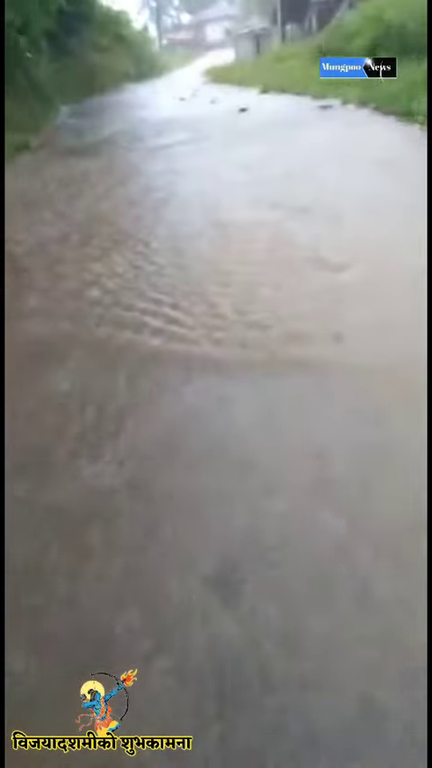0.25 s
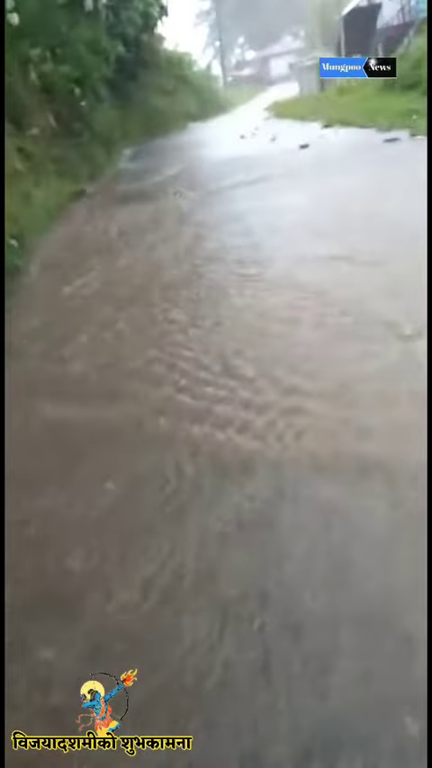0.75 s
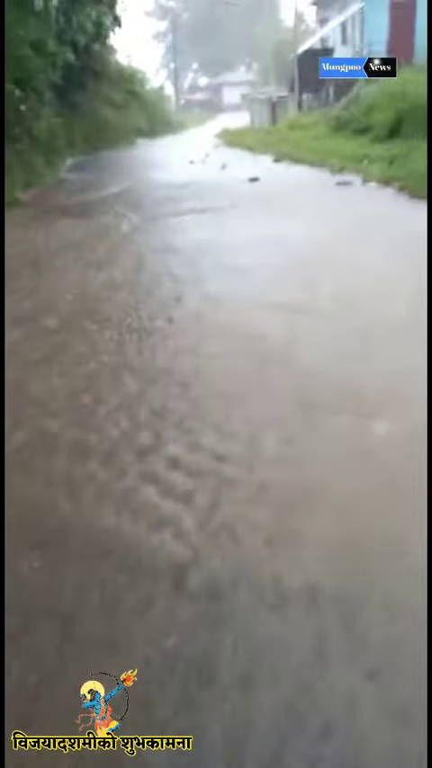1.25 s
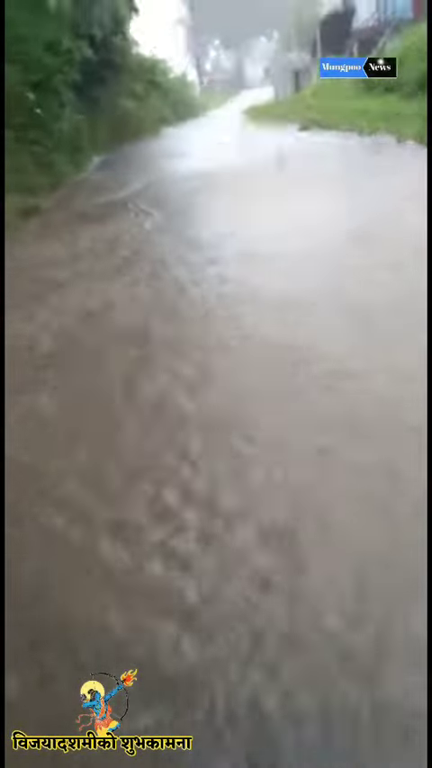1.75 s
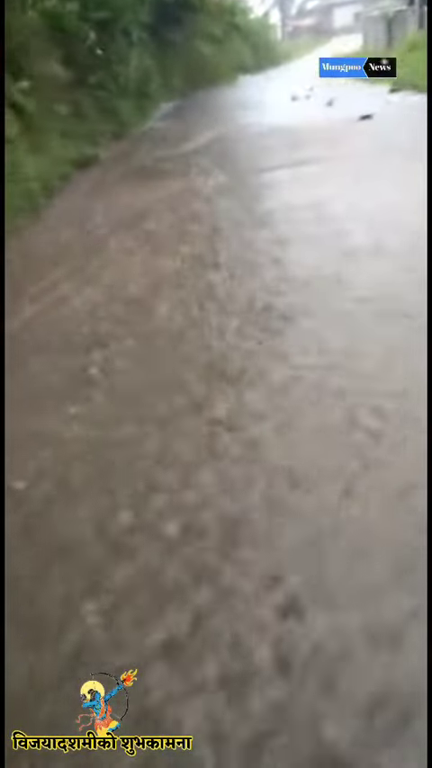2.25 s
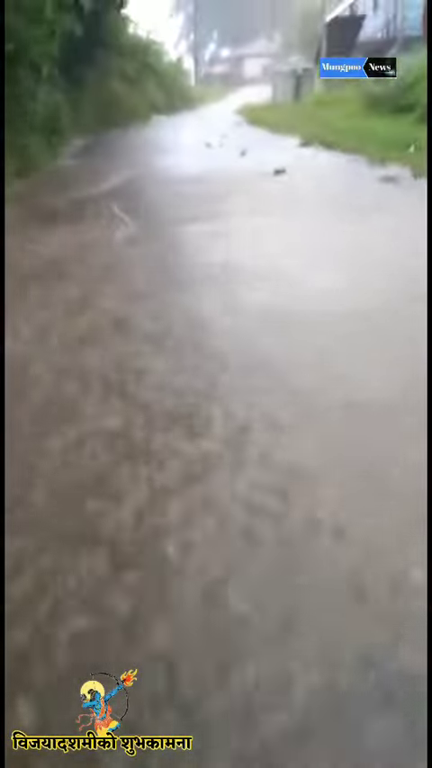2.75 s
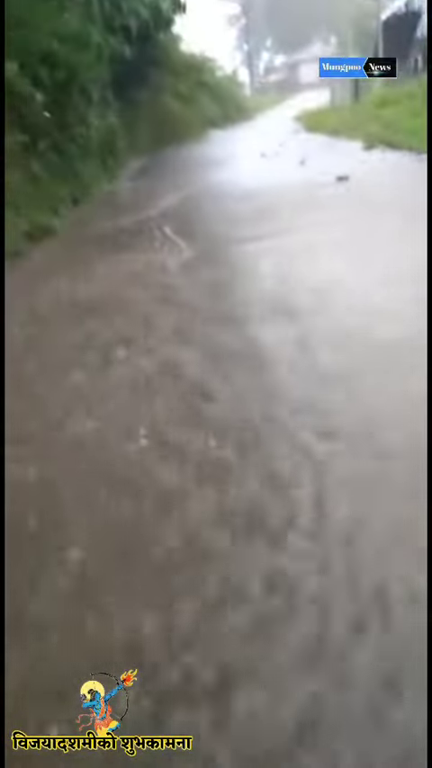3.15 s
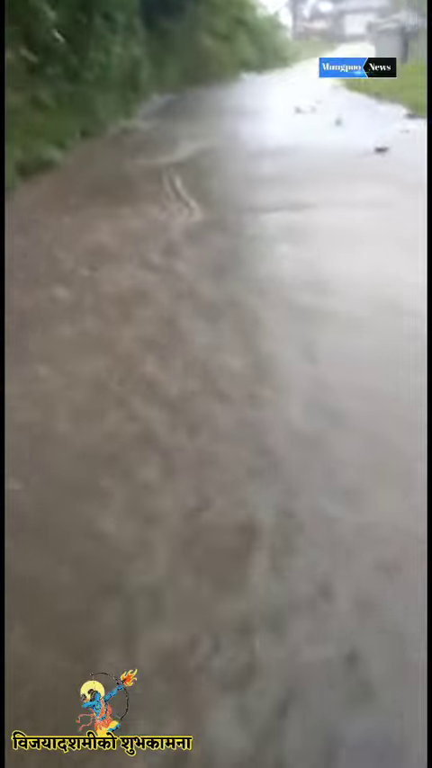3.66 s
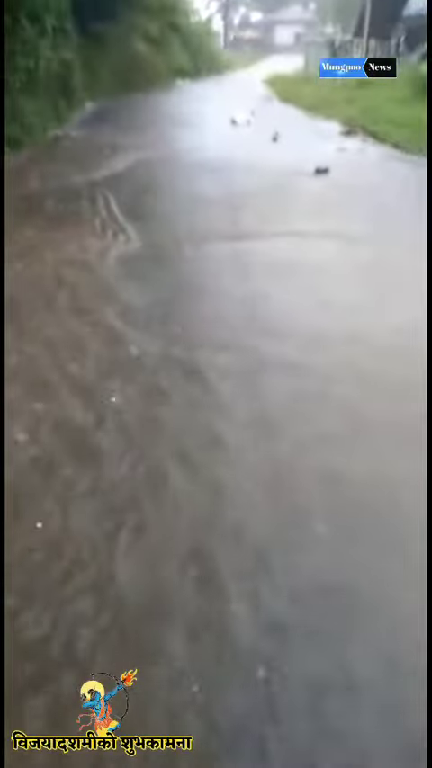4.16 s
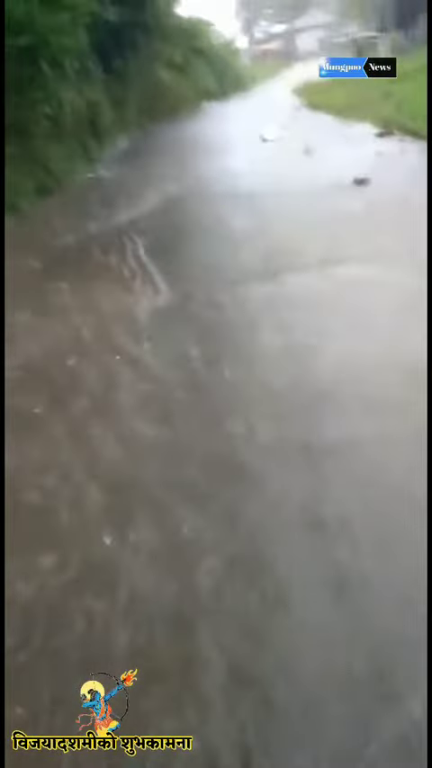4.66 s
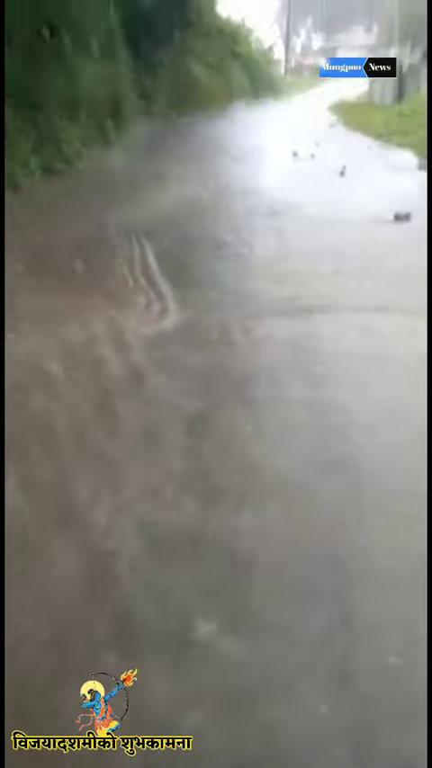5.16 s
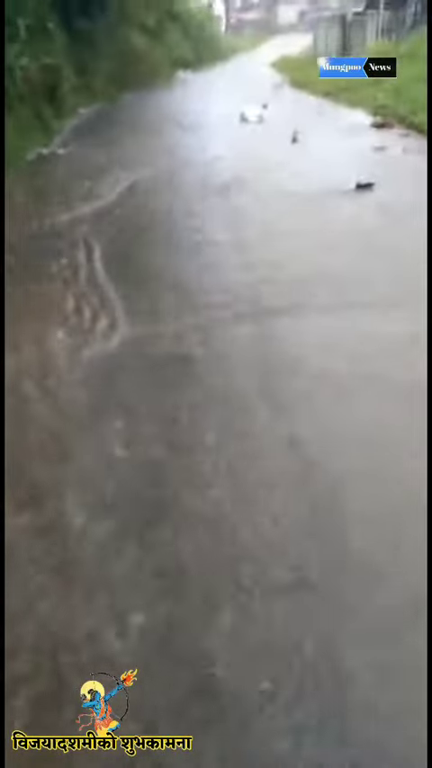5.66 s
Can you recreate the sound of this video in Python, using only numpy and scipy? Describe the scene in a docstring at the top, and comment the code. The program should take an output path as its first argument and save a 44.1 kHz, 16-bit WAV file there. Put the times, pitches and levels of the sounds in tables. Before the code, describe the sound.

A very close stereo microphone catches floodwater running over a road. Dull pops and bubbles crowd into a thick gurgle leaning left, strongest near one second, reaching both sides when it breaks. It comes back in briefer bursts, then thins to isolated plops. Sharp, glassy droplet clicks spatter throughout and grow more exposed later, with a sudden spray on both sides, over even watery hiss and faint low rumble.

```python
"""A low, grainy churning right beside the left microphone port comes in surges, long and strong at first, then ever
shorter; after four seconds only single plops are left. It is made of dull pops rung through shifting resonances.
Bright spatters of clumped clicks land close to the ports, whose cavities ring near 9.5 kHz; hard drops crack on them,
and one loud spray showers both. Behind it all, floodwater runs over a road: steady shaped noise with fine ticks."""
import sys
import numpy as np
from scipy import signal
from scipy.fft import rfft, irfft, next_fast_len
from scipy.io import wavfile
from scipy.ndimage import uniform_filter1d, map_coordinates

SR = 44100
rng = np.random.default_rng(int(sys.argv[2]) if len(sys.argv) > 2 else 0)


def master(y):
    """Save y as 16-bit WAV."""
    cut = np.clip(np.atleast_2d(y).T, -1, 1)
    pcm = np.round(cut * 32767)  # scale
    wavfile.write(sys.argv[1], SR, pcm.astype(np.int16))


N = 259749  # length in samples


def amp(db):
    """Decibels to gain."""
    return 10 ** (np.asarray(db) / 20)


def unit(x):
    """Scale to rms 1."""
    return x / np.sqrt(np.mean(x ** 2) + 1e-20)


def along(points, hz):
    """Read a curve of (Hz, value) points on a log frequency axis."""
    f, v = np.transpose(points)
    return np.interp(np.log(hz + 1), np.log(f + 1), v)


def wobble(rate):
    """A smooth random curve of rms 1 with rate knots a second."""
    knots = rng.standard_normal(int(N * rate / SR) + 4)
    return unit(map_coordinates(knots, [np.arange(N) * rate / SR]))


def filtered(x, response):
    """Multiply the spectrum of x by a response of frequency."""
    m = next_fast_len(N + 8192)
    return irfft(rfft(x, m) * response(np.fft.rfftfreq(m, 1 / SR)), m)[..., :N]


def ring(x, colour_db, size=2048):
    """Strike a causal (minimum-phase) body that has the given dB response."""
    cepstrum = irfft(np.log(amp(colour_db(np.fft.rfftfreq(size, 1 / SR)))))
    # fold the cepstrum onto positive time
    cepstrum[1:size // 2] *= 2
    cepstrum[size // 2 + 1:] = 0
    impulse = irfft(np.exp(rfft(cepstrum)))
    return signal.fftconvolve(x, impulse)[:len(x)]


def bump(hz, centre_hz, width_hz):
    """The outline of one resonance, 1 at its centre."""
    return 1 / (1 + (2 * (hz - centre_hz) / width_hz) ** 2)


def grains(count, rate, spread_db):
    """count samples of random impulses, rate a second, with log-normal sizes and rms 1."""
    hit = rng.random(count) < rate / SR
    sign = rng.choice([-1, 1], count)
    size = amp(spread_db * np.clip(rng.standard_normal(count), -2, 2))
    return unit(hit * sign * size)


def sides(pan_db):
    """Left and right gains of mean power 1 for a left minus right level in dB."""
    g = amp(np.array([pan_db, -pan_db]) / 2).reshape(2, -1)
    return g / np.sqrt(np.mean(g ** 2, axis=0))


def add(track, s, x):
    """Mix x into the track at time s."""
    start = max(round(s * SR), 0)
    track[:, start:start + x.shape[1]] += x[:, :N - start]


def spread_starts(count):
    """Random start samples, one in each of count equal slots."""
    return ((np.arange(count) + rng.random(count)) * N / count).astype(int)


def patchy(x, depth_db, width_hz, life):
    """Passing resonances: random peaks and dips, width_hz wide, that last for life seconds."""
    hz, t, z = signal.stft(x, SR, nperseg=768, noverlap=576)
    where = np.array(np.meshgrid(hz / width_hz, t / life, indexing="ij"))
    knots = rng.standard_normal((int(where[0].max()) + 3, int(where[1].max()) + 3))
    gain = amp(depth_db * np.clip(map_coordinates(knots, where, order=2), -2, 1.7))
    power = np.abs(z).reshape(-1, *gain.shape) ** 2 + 1e-20
    # the resonances move energy between pitches and leave the loudness alone
    gain = gain * np.sqrt(power.sum(axis=(0, 1)) / (power * gain ** 2).sum(axis=(0, 1)))
    return signal.istft(z * gain, SR, nperseg=768, noverlap=576)[1][..., :N]


# Colour of the hiss. Each row: frequency in Hz, level in dB.
FLOW_COLOUR = [(180, -28), (300, -4.5), (485, -1), (536, 2), (1330, -3.5), (1860, -3), (2050, -2),
               (3060, -4), (7870, -6), (9450, 4.5), (11500, -7.5), (14500, -13.5), (15800, -19)]
# Likeness of the hiss at the two ports. Each row: frequency in Hz, coherence from 0 to 1.
FLOW_COHERENCE = [(60, 1), (300, 1), (700, 0.43), (1500, 0), (15000, 0)]
# Colour of the low rumble. Each row: frequency in Hz, level in dB.
RUMBLE_COLOUR = [(20, -21), (40, -18), (62, -3), (100, -3), (160, -3), (260, -5), (400, -8), (900, -53)]
FLOW_DB, RUMBLE_DB = -40.5, -50


def flow():
    """The sheet of water on the road: an even hiss with fine ticks, over a low rumble nearly alike at both ports."""
    source = np.array([rng.standard_normal(N) + 0.62 * grains(N, rate=1400, spread_db=6) for _ in range(2)])
    # the angle between mid and side sets how alike the ports are
    turn = lambda hz: np.arccos(np.clip(along(FLOW_COHERENCE, hz), -1, 1)) / 2
    mid_side = lambda hz: amp(along(FLOW_COLOUR, hz)) * [np.cos(turn(hz)), np.sin(turn(hz))]
    mid, side = filtered(source, mid_side)
    hiss = unit(patchy(np.array([mid + side, mid - side]), depth_db=1.5, width_hz=200, life=.03))
    deep = rng.standard_normal(N) + 0.095 * rng.standard_normal((2, N))
    rumble = unit(filtered(deep, lambda hz: amp(along(RUMBLE_COLOUR, hz))))
    return hiss * amp(FLOW_DB + 1.23 * wobble(3.404)) + rumble * amp(RUMBLE_DB + 0.86 * wobble(6.5))


# Colour that the port cavities give to bright water. Each row: frequency in Hz, level in dB.
PORT_COLOUR = [(300, -100), (1000, -8), (1700, -20.5), (2500, -8.5), (3300, -10.5), (4800, -11.5),
               (6000, -8), (7200, -10), (8400, -5), (9500, 0.5), (10700, -6), (12500, -13.5), (15500, -24)]


def port_db(hz):
    """dB: the small cavity of a port rings near 9.5 kHz."""
    return along(PORT_COLOUR, hz)


def thin(hz):
    """dB: fine drops have little body below 5 kHz."""
    return -13 * np.clip((5300 - hz) / 1200, 0, 1)


SPRAY_FULL_S, SPRAY_HOLD_S, SPRAY_DB = 4.553, 0.062, -19.5  # time of full level, hold, level
SPRAY_RISE_DB_PER_S, SPRAY_FALL_DB_PER_S = 400, 290


def spray():
    """A shower of fine, clumped clicks on both ports, thin below their ring; it swells, holds and dies away."""
    t = np.arange(N) / SR - SPRAY_FULL_S
    rise_db = SPRAY_RISE_DB_PER_S * np.minimum(t, 0)
    fall_db = SPRAY_FALL_DB_PER_S * np.maximum(t - SPRAY_HOLD_S, 0)
    colour_db = lambda hz: port_db(hz) + 7 * bump(hz, 9500, width_hz=2200) + thin(hz)
    clicks = [grains(N, rate=5000, spread_db=3) * amp(3.5 * wobble(200)) for _ in range(2)]
    pair = np.array([unit(ring(x, colour_db)) for x in clicks])
    return patchy(pair, depth_db=8, width_hz=420, life=.02) * amp(SPRAY_DB + rise_db - fall_db)


# Hard drops on the ports. Each row: start in seconds, relative peak level in dB, ring in Hz, left minus right in dB.
DROPS = [(1.976, -9.5, 9600, 22), (2.6555, -8, 8800, 5), (2.929, -8, 9600, -6), (3.6217, -4, 8000, 6),
         (3.6377, -3, 7800, 9), (4.5162, -16, 10340, 4), (4.549, -1, 9700, 3), (4.567, -7, 9650, -4),
         (4.6092, -4, 9390, -1), (4.618, -5, 9560, -4), (4.6239, -7.5, 5800, 2), (5.016, -23, 9220, -10),
         (5.067, -19, 8960, 4), (5.182, -13, 5400, -3), (5.305, -25, 6050, 14), (5.672, -11.5, 9650, -13),
         (5.686, -8, 9220, -20), (5.852, 0, 9300, -1), (5.8556, -9.5, 5360, 10), (5.8715, -11, 7320, 3)]
DROP_CRACK_S, DROP_RING_DB = 0.00084, 15.5  # decay time constant of the crack, height of the ring
DROP_MIST_DB, DROP_MIST_S = -23, 0.0046  # level under the crack, decay time constant


def drops():
    """Single drops strike the ports: a crack of about a millisecond rings briefly and leaves a little mist."""
    out, t = np.zeros((2, N)), np.arange(SR // 30) / SR
    shape = np.exp(-t / DROP_CRACK_S) + amp(DROP_MIST_DB) * np.exp(-t / DROP_MIST_S)
    for s, db, ring_hz, pan_db in DROPS:
        colour_db = lambda hz: port_db(hz) + DROP_RING_DB * bump(hz, ring_hz, width_hz=1400) + thin(hz)
        pair = [ring(x, colour_db) for x in shape * rng.standard_normal((2, len(t)))]
        pair = np.array([x / np.abs(x).max() for x in pair])
        add(out, s, pair * sides(pan_db) * amp(db))
    return out


# The loudest spatters. Each row: time in seconds, relative level in dB, ring in Hz, left minus right in dB,
# length of the burst in seconds, extra sparkle at the top in dB.
SPATTERS = [(0.045, -17.5, 9200, 10, 0.067, -13), (0.087, -19.5, 9100, 13, 0.074, -21),
            (0.2255, -12.5, 9650, -5, 0.37, 0), (0.315, -16, 6260, 2, 0.058, -7),
            (0.5374, -17.5, 9400, 18, .083, -5), (0.588, -14.5, 9580, 18, 0.068, -4),
            (0.634, -24.5, 10000, 8, 0.058, -1), (0.9053, -17.5, 9220, 11, 0.054, -6),
            (0.936, -18, 8700, 10.5, 0.053, -16), (0.987, -18.5, 6980, -5, .09, 9),
            (1.019, -23, 9300, 14, 0.052, 13), (1.1165, -18, 9300, 10, 0.27, -1),
            (1.17, -20, 6540, 6, 0.035, 6), (1.3065, -16, 9460, 18, 0.2, -3),
            (1.641, -24, 10100, -5, 0.074, 11), (1.696, -22.5, 8700, 6.5, 0.057, -6),
            (1.72, -23, 9300, -3, 0.06, 2), (1.792, -24.5, 6940, 11, 0.068, 0),
            (1.812, -24.5, 8900, 9, 0.061, 9), (1.947, -16.5, 5580, 7, 0.034, 7),
            (1.974, -18.5, 9260, 14, 0.027, 17), (2.077, -32, 6700, 3, 0.044, -3),
            (2.134, -26, 9600, 8, 0.063, 0), (2.19, -31, 8900, 5, 0.066, 12),
            (2.469, -21, 11470, 15, 0.16, 5), (2.619, -18.5, 9000, 12, 0.044, -8),
            (2.65, -18, 8800, 1, 0.11, 4), (2.696, -16, 9050, 18, .07, 3), (2.93, -7.5, 9300, -2, 0.092, 0),
            (2.963, -8, 9340, 8, 0.038, 1), (3.085, -22.5, 6500, 9, .07, -12),
            (3.139, -14.5, 9100, 19, 0.061, -16), (3.1795, -18, 9200, 16, .09, 7),
            (3.281, -21, 8900, 13, 0.02, 9), (3.427, -24, 14500, -2, 0.064, 20),
            (3.619, -9.5, 7680, -4, 0.061, -20), (3.634, -10.5, 8060, 8, 0.18, 2),
            (3.8673, -14.5, 9900, 16, 0.29, -30), (3.935, -17.5, 9470, 3, 0.2, 11),
            (4.153, -21.5, 8900, 13, 0.054, -10), (4.259, -20.5, 9330, -1, 0.7, 12),
            (4.392, -19, 10200, 6, .06, -4), (4.487, -18, 8200, 3, 0.11, -6),
            (4.514, -14.5, 10500, 1, 0.064, 20), (4.546, -10, 9150, -12, 0.032, -6),
            (4.617, -7.5, 9100, 2, 0.2, 5), (4.943, -22, 9500, 14, 0.037, -8),
            (5.004, -10, 9130, -2, 0.11, 10), (5.036, -15, 10300, 5, 0.21, 7),
            (5.071, -13, 9770, 0, 0.19, 10), (5.182, -22.5, 6340, 7, 0.077, 0),
            (5.242, -17.5, 9360, 5, 0.053, -14), (5.301, -13, 8220, -3, 0.068, 10),
            (5.349, -19, 8400, 15, .08, 6), (5.619, -24.5, 9760, 5, .1, 10),
            (5.648, -21, 9600, -7, 0.11, 0), (5.672, -13.5, 9500, -7, 0.089, 4),
            (5.683, -12.5, 9260, -4, 0.057, 8), (5.827, -20, 8600, 5, 0.047, 2),
            (5.854, -7.5, 9500, 6, 0.045, 1), (5.87, -11.5, 7270, 11, 0.13, -11)]


def spatters():
    """Each burst of clumped clicks swells to a bright pip, rings with narrow tones and leaves a faint tail."""
    out, t = np.zeros((2, N)), np.arange(SR // 4) / SR
    for s, db, ring_hz, pan_db, length, sparkle_db in SPATTERS:
        rise = np.minimum(t / .016, 1) ** 2
        burst_shape = amp(-60 * (t / max(length, .005)) ** 0.83)
        tail_shape = amp(-26 - 60 * t / 0.36)
        swell = rise * (burst_shape + tail_shape)
        tones_hz = rng.uniform(5800, 15000, 10)
        tones = lambda hz: 11 * np.max([bump(hz, f, width_hz=140) for f in tones_hz], axis=0)
        own = lambda hz: 8 * bump(hz, ring_hz, width_hz=1300) + 6 * bump(hz, ring_hz, width_hz=300)
        sparkle = lambda hz: sparkle_db * np.clip((hz - 10200) / 2200, 0, 1)
        colour_db = lambda hz: port_db(hz) + own(hz) + tones(hz) + sparkle(hz) + 0.22 * thin(hz)
        pair = []
        for port in range(2):
            clumps = amp(3 * np.interp(t, t[::200], rng.standard_normal(len(t[::200]))))
            clicks = swell * clumps * grains(len(t), rate=3700, spread_db=2.0)
            burst = ring(clicks, colour_db)
            burst = burst / np.sqrt(uniform_filter1d(burst ** 2, size=300).max())
            pip_shape = np.exp(-np.abs(t - rng.uniform(0.0106, 0.0152)) / 0.0013)
            pair.append(burst + 2.1 * pip_shape * np.sin(2 * np.pi * ring_hz * t))
        add(out, s - .01, np.array(pair) * sides(pan_db) * amp(db - 10.5))
    return np.array([patchy(x, depth_db=6.5, width_hz=300, life=.04) for x in out])


# Surges of the churning. Each row: start in seconds, hold in seconds, relative level in dB,
# relative brightness in dB (the share of the upper pops).
SURGES = [(-0.01, 0.056, -24, -11), (0.03, 0.144, -20, -0.5), (0.173, .29, -23, -5), (0.478, .18, -18, -2),
          (0.693, 0.21, -19.5, -3.5), (0.887, 0.12, -15.5, -5.5), (1.023, 0.06, -22.5, -10),
          (1.117, 0.12, -18, -4.5), (1.194, 0.25, -17.5, -3.5), (1.522, 0.072, -32.5, -3),
          (1.715, 0.016, -18, 0.5), (1.767, 0.06, -18.5, -1), (1.861, .02, -22, -6),
          (1.907, 0.23, -19.5, -3), (2.179, 0.027, -21.5, -8.5), (2.248, .15, -26.5, -7.5),
          (2.446, 0.082, -25, -4.5), (2.591, .15, -21, -4), (2.772, .07, -29, -11), (2.939, .03, -25, 0),
          (3.128, 0.013, -29, 0), (3.169, 0.028, -29, 1.5), (3.24, 0.087, -35.5, -4.5),
          (3.439, 0.022, -29, -4), (3.586, 0.015, -25.5, 2), (3.624, .1, -29.5, 2), (3.752, 0.03, -27, -8),
          (3.878, 0.02, -29.5, 4), (3.919, 0.022, -23, 7), (3.972, 0.061, -28, -4)]
SURGE_ATTACK_S, SURGE_FALL_DB_PER_S = 0.011, 190.5


def surging():
    """Level of the churning in dB: each surge rises quickly, holds and drains away."""
    t = np.arange(N) / SR
    each = []
    for s, hold, db, _ in SURGES:
        fall_db = SURGE_FALL_DB_PER_S * np.maximum(t - s - hold, 0)
        each.append(np.clip((t - s) / SURGE_ATTACK_S, 0, 1) * amp(db - fall_db))
    return 20 * np.log10(np.max(each, axis=0) + 1e-6)


SETTLE_S = 0.055  # time constant with which a surge settles


def breaking(level_db):
    """Near 1 where a surge has just broken, 0 once it has settled."""
    keep = np.exp(-1 / (SETTLE_S * SR))
    settled = signal.lfilter([1 - keep], [1, -keep], amp(level_db))
    return np.clip(1 - settled / amp(level_db), 0, 1)


LEFT_DB, BREAK_WIDENS_DB = 7, 8  # left minus right at the usual level; less as a surge breaks
USUAL_DB, WIDENS_DB_PER_DB = -15, 0.41  # stronger surges reach the right port too


def leaning(level_db):
    """Left minus right dB: weak churning stays by the left port, strong or breaking water reaches both."""
    weaker_db = np.clip(USUAL_DB - level_db, -8, 8)
    return LEFT_DB + WIDENS_DB_PER_DB * weaker_db - BREAK_WIDENS_DB * breaking(level_db)


def fizz(level_db):
    """Fine tinkling crackle that grows with the churning, by half as many dB."""
    clicks = [grains(N, rate=2100, spread_db=9.5) * amp(7.4 * wobble(45)) for _ in range(2)]
    pair = np.array([unit(ring(x, port_db)) for x in clicks])
    pair = patchy(pair, depth_db=8, width_hz=280, life=.04)
    return pair * sides(0.23 * leaning(level_db)) * amp(.5 * level_db - 32.5)


TINKLE_HZ, TINKLE_SPREAD_OCT, TINKLE_T60_S = 9200, .36, 0.03
TINKLE_DB, TINKLE_SPREAD_DB, TINKLE_LEFT_DB = -40.5, 9, 10


def tinkles(level_db, count):
    """Tiny droplets, each a short high ping of its own pitch, thrown up mostly while the churning is strong."""
    out, t = np.zeros((2, N)), np.arange(SR // 12) / SR
    chance = np.cumsum(amp(np.clip(level_db, -42, -26)))
    draws = (np.arange(count) + rng.random(count)) / count
    times = np.searchsorted(chance / chance[-1], draws) / SR
    for s, (pitch, size, pan) in zip(times, np.clip(rng.standard_normal((count, 3)), -2, 2)):
        hz = TINKLE_HZ * 2 ** (TINKLE_SPREAD_OCT * pitch)
        roughness = np.cumsum(0.018 * rng.standard_normal(len(t)))
        ping = np.sin(2 * np.pi * hz * t + roughness)
        ping = ping * (1 - np.exp(-t / 0.00043)) * amp(-60 * t / TINKLE_T60_S)
        add(out, s, ping * sides(TINKLE_LEFT_DB + 7 * pan) * amp(TINKLE_DB + TINKLE_SPREAD_DB * size))
    return out


# Low thumps under the hardest churning. Each row: time in seconds, peak level in dB.
THUMPS = [(1.297, -47), (1.313, -30), (1.428, -33)]
THUMP_S = 0.0012  # half width of the push


def thumps():
    """Soft, low pushes without a ring, alike at both ports."""
    t = np.arange(N) / SR
    return -sum(amp(db) * np.exp(-((t - s) / THUMP_S) ** 2) for s, db in THUMPS)


# Clear ringing bubbles. Each row: start in seconds, relative level in dB, starting pitch in Hz, t60 in seconds.
BUBBLES = [(2.887, -31, 901, 0.12), (3.18, -35, 4560, 0.057), (3.232, -26, 910, 0.11),
           (3.269, -29, 1060, 0.17), (3.516, -36, 927, 0.31), (3.631, -22, 826, 0.081),
           (3.667, -28.5, 504, 0.13), (3.683, -39, 4050, 0.21), (3.7, -25, 785, 0.086),
           (3.729, -24.5, 1210, 0.043), (3.775, -25, 830, 0.09), (3.836, -32, 974, 0.15),
           (3.928, -23, 1091, 0.1), (4.024, -29, 613, 0.22), (4.05, -30, 1720, 0.05),
           (4.07, -28, 334, 0.061), (4.565, -35.5, 4180, 0.1), (4.636, -31, 2580, 0.12),
           (4.679, -37, 2310, 0.071), (5.305, -27, 411, 0.096), (5.317, -20.5, 1200, 0.022),
           (5.514, -31.5, 950, 0.039), (5.633, -21, 786, 0.05)]


def bubbles():
    """Short tones with a soft start and a small rise in pitch; the higher, the rougher."""
    out, t = np.zeros((2, N)), np.arange(SR // 5) / SR
    unsteady = 0.68 * wobble(330)
    for s, db, pitch_hz, t60 in BUBBLES:
        roughness = min(pitch_hz / 1000, 3) * unsteady[round(s * SR):][:len(t)]
        phase = 2 * np.pi * pitch_hz * t * (1 + 0.305 * t) + roughness
        tone = np.sin(phase) * (1 - np.exp(-t / 0.0018)) * amp(-60 * t / max(t60, .005))
        add(out, s, tone * sides(pan_db=14.5) * amp(db + 8.0))
    return out


GURGLE_HZ, GURGLE_SPREAD_OCT, GURGLE_RISE_PER_S = 876, 0.645, 3.2
GURGLE_CYCLES = 69  # cycles to fall by 60 dB
GURGLE_DB, GURGLE_SPREAD_DB = -1, 1.5  # over the surge level


def gurgles(level_db, count):
    """Small bubbles inside the churning: brief blips that rise a little, louder in a stronger surge."""
    out, t = np.zeros((2, N)), np.arange(SR // 8) / SR
    starts = spread_starts(count)
    for i, (pitch, size, pan) in zip(starts, np.clip(rng.standard_normal((count, 3)), -1.8, 1.8)):
        hz = GURGLE_HZ * 2 ** (GURGLE_SPREAD_OCT * pitch)
        blip = np.sin(2 * np.pi * hz * t * (1 + GURGLE_RISE_PER_S * t / 2))
        blip = blip * (1 - np.exp(-t / 0.0014)) * amp(-60 * t * hz / GURGLE_CYCLES)
        gain = amp(level_db[i] + GURGLE_DB + GURGLE_SPREAD_DB * size)
        add(out, i / SR, blip * sides(LEFT_DB + 4 * pan) * gain)
    return out


# Colours of the low water at the left and the right port. Each row: frequency in Hz, level in dB.
LOW_COLOUR_LEFT = [(40, -62), (130, -37), (250, -14), (350, -17), (470, -0.5), (620, -0.5), (850, 1),
                   (1100, -1.5), (1320, -3.5), (1500, -9), (1720, 1), (2050, -3), (2300, -10),
                   (2600, -17.5), (3500, -17.5), (8000, -55)]
LOW_COLOUR_RIGHT = [(40, -72), (130, -32.5), (250, -16.5), (350, -4.5), (470, -1.5), (700, -11),
                    (1000, -8.5), (1200, -9), (1550, -3.5), (2000, -10.5), (2250, -18.5), (2600, -11),
                    (3500, -19.5), (8000, -53.5)]
PORT_LAG_S = 0.00037  # the shared sound reaches the left port later


def at_ports(shared, left, right, own_db):
    """Low impulses as both ports hear them: alike in the bass, partly unrelated higher up, later on the left."""
    late = np.roll(shared, round(PORT_LAG_S * SR))
    highpass = signal.butter(2, 650, "high", fs=SR, output="sos")
    own = signal.sosfilt(highpass, amp(own_db) * np.array([left, right]))
    return np.array([ring(late + own[0], lambda hz: along(LOW_COLOUR_LEFT, hz)),
                     ring(shared + own[1], lambda hz: along(LOW_COLOUR_RIGHT, hz))])


# The loudest plops. Each row: time in seconds, relative peak level in dB, pitch in Hz, left minus right in dB,
# length of the swell in seconds (its fall by 36 dB).
PLOPS = [(0.056, -8.5, 616, 19, 0.11), (0.136, -14, 980, 17, 0.04), (0.33, -5, 476, 7.5, 0.062),
         (0.475, -4.5, 930, 13, 0.048), (0.61, -5.5, 1220, 25, 0.045), (0.664, -8.5, 676, 14, 0.18),
         (0.688, -1.5, 890, 5, 0.17), (0.71, -3, 750, 3, 0.047), (0.771, -3.5, 716, 12, 0.099),
         (0.905, -8, 890, 0, 0.04), (0.943, -2, 524, 2, 0.055), (0.958, -5, 1500, 4, 0.044),
         (0.978, -5, 488, 0, 0.044), (1.024, -3, 700, 9, 0.077), (1.116, -4.5, 370, 0.5, 0.075),
         (1.248, -4.5, 900, 15, 0.17), (1.295, -2.5, 890, 14, 0.064), (1.306, -3, 1010, 6, 0.15),
         (1.342, -5, 613, 7, 0.17), (1.379, -0.5, 1437, 1.5, 0.2), (1.414, -6.5, 627, 3, 0.027),
         (1.585, -14, 864, 12, 0.41), (1.714, -6, 760, 5, 0.077), (1.757, -5.5, 820, 3.5, 0.44),
         (1.912, -4, 484, 8, 0.15), (2.012, -1.5, 706, 18, 0.039), (2.025, -6, 1110, 14, 0.048),
         (2.102, -9.5, 620, 20, 0.072), (2.203, -6.5, 900, 0, 0.039), (2.229, -11, 1800, 12, 0.03),
         (2.566, -10, 630, 15, 0.35), (2.651, -8.5, 580, 11, 0.023), (2.751, -6, 754, 13, 0.078),
         (2.825, -8.5, 760, 7, 0.06), (2.952, -9.5, 630, 17, 0.13), (3.137, -14.5, 670, 9, 0.1),
         (3.177, -9, 1400, 24, 0.074), (3.347, -12, 930, 22, 0.019), (3.371, -11.5, 870, 10, 0.078),
         (3.454, -9, 470, 6.5, 0.067), (3.574, -8.5, 636, -2, 0.032), (3.587, -6, 886, 8.5, 0.035),
         (3.685, -13, 764, 11, 0.04), (3.703, -20, 615, 14, 0.026), (3.755, -15, 820, 17, 0.06),
         (3.784, -13, 840, 25, 0.028), (3.91, -11, 1140, 15, 0.078), (3.938, -10.5, 1170, 9, 0.18),
         (3.997, -11, 1700, 7, 0.092), (4.019, -14, 633, 6, 0.15), (4.067, -9.5, 580, 7, 0.035),
         (4.25, -14.5, 1170, 12, 0.071), (4.293, -20.5, 1300, 21, 0.1), (4.467, -12, 606, 6, 0.055),
         (4.616, -26, 990, 4, 0.045), (5.003, -9, 1056, 17, 0.12), (5.073, -14, 910, 11, 0.064),
         (5.18, -16, 585, 1, 0.049), (5.301, -7.5, 436, 4, 0.13), (5.357, -8, 840, 9, 0.044),
         (5.382, -20, 770, 16, 0.1), (5.626, -14, 687, 16, 0.1), (5.681, -19, 940, 5, 0.081),
         (5.794, -18.5, 920, 7, 0.11)]


def plops():
    """One hard push inside a short swell of weaker pops; it rings at its own pitch and is dull well above it."""
    out, t = np.zeros((2, N)), np.arange(SR // 5) / SR
    for s, db, pitch_hz, pan_db, length in PLOPS:
        swell = np.minimum(t / 0.0016, 1) ** 2 * amp(-36 * t / max(length, .005))
        trail = [0.04 * grains(len(t), rate=800, spread_db=3.5) * swell for _ in range(3)]
        trail[0][round(.007 * SR)] += 1  # the push, shared by both ports
        dull = lambda hz: -11 * np.clip((hz - 900 - .6 * pitch_hz) / 500, 0, 1)
        lean = lambda hz: -9 * np.clip((330 - hz) / 130, 0, 1)
        pitch = lambda hz: 10 * bump(hz, pitch_hz, width_hz=157)
        colour_db = lambda hz: pitch(hz) - 4 * hz / (hz + 1500) + dull(hz) + lean(hz)
        pair = [ring(x, colour_db) for x in at_ports(*trail, own_db=2)]
        pair = np.array([x / np.abs(x).max() for x in pair])
        add(out, s - .004, pair * sides(pan_db) * amp(db - 3.5))
    return out


def lulls():
    """dB: the churning holds back for a moment around the onset of every plop."""
    out, t = np.zeros((1, N)), np.arange(SR // 25) / SR
    for s, *_ in PLOPS:
        add(out, s - .024, -8 * np.exp(-((t[None] - .02) / .0055) ** 2))
    return out[0]


GULPS_PER_S, GULP_DECAY_S, GULP_SPREAD_DB = 58, 0.0027, 3
BED_DB, BED_DB_PER_DB = 3.5, 0.3  # even churning between the gulps at the usual level; its change with level


def gulps(level_db):
    """Gain of local rms 1: uneven gulps that drain quickly, over a bed that thins out as the surge weakens."""
    count = int(N / SR * GULPS_PER_S)
    starts = spread_starts(count)
    sizes = np.bincount(starts, amp(GULP_SPREAD_DB * rng.standard_normal(count)), N)
    drained = signal.lfilter([1], [1, -np.exp(-1 / (GULP_DECAY_S * SR))], sizes)
    bed = amp(BED_DB + BED_DB_PER_DB * np.clip(level_db - USUAL_DB, -12, 6))
    gain = uniform_filter1d(drained, size=60) + bed
    return gain / np.sqrt(np.abs(uniform_filter1d(gain ** 2, size=3000)) + 1e-12)


# Pitches of the pops that make up the churning: a plain list, in Hz.
POP_HZ = [436, 605, 883, 1020, 1263, 1863, 2260]
POPS_PER_S, POP_SPREAD_DB, POP_Q, POP_RING = 52, 2.5, 3.8, 1.93  # at each pitch; sharpness and gain of the ring


def popping():
    """A random train of sharp pops, each ringing for a cycle or two at one of several pitches."""
    total = np.zeros(N)
    for hz in POP_HZ:
        train = grains(N, rate=POPS_PER_S, spread_db=POP_SPREAD_DB)
        total += train + POP_RING * signal.lfilter(*signal.iirpeak(hz, POP_Q, SR), train)
    return unit(total)


ROAR_DB, TRICKLE_DB = -18.5, -25  # levels of a dense roar and of a trickle in which single resonances stand out
DEPTH_DB, BREAK_DEPTH_DB = -15.5, 9.5  # relative depth (bass share) when settled; extra as a surge breaks
DEPTH_DB_PER_DB = 1.3  # stronger surges are deeper


def churn(level_db):
    """Hundreds of short, dull pops a second through mild resonances that keep shifting."""
    start, _, _, brightness = np.transpose(SURGES)
    latest = np.maximum(np.searchsorted(start, np.arange(N) / SR) - 1, 0)
    bright_db = uniform_filter1d(brightness[latest], size=400)
    stronger_db = np.maximum(level_db - USUAL_DB, -10)
    depth_db = DEPTH_DB + BREAK_DEPTH_DB * breaking(level_db) + DEPTH_DB_PER_DB * stronger_db
    pair = at_ports(popping(), popping(), popping(), own_db=-1.0)
    pair = patchy(pair, depth_db=4, width_hz=140, life=.024)
    pair = patchy(pair, depth_db=2.5, width_hz=60, life=.11)
    trickle = np.clip((ROAR_DB - level_db) / (ROAR_DB - TRICKLE_DB), 0, 1)
    pair = (1 - trickle) * pair + trickle * patchy(pair, depth_db=6.5, width_hz=150, life=.06)
    # rebalance the bass and the upper pops as the surges go
    low = filtered(pair, lambda hz: np.exp(-((hz - 370) / 150) ** 2))
    high = filtered(pair, lambda hz: 1 - 1 / (1 + (hz / 1450) ** 8))
    middle = pair - low - high
    pair = middle + low * amp(1.58 * (depth_db + 13.0)) + high * amp(1.52 * (bright_db + 1.0))
    # the pops are soft: they drop away sharply above 2.5 kHz
    pair = filtered(pair, lambda hz: 0.3 + 0.7 / (1 + (hz / 2500) ** 30))
    # they crowd evenly, so that the level follows the strength of the churning
    pair = pair / np.sqrt(np.abs(uniform_filter1d(pair ** 2, size=1500)) + 1e-12)
    return pair * sides(leaning(level_db)) * gulps(level_db) * amp(level_db + 1.0 + lulls())


def scene():
    """All sources at the two ports; the surges drive the churning, its gurgles, its fizz and its droplets."""
    level_db = surging()
    bright = fizz(level_db) + tinkles(level_db, count=130) + spatters() + drops() + spray()
    low = churn(level_db) + gurgles(level_db, count=210) + plops() + bubbles() + thumps()
    return flow() + bright + low


def record(dry):
    """Round off the highest peaks and keep nothing above the band limit."""
    rounded = dry / (1 + np.abs(dry / .9) ** 6) ** (1 / 6)
    return filtered(rounded, lambda hz: hz < 15800)


dry = scene()
out = record(dry)
master(out)
```